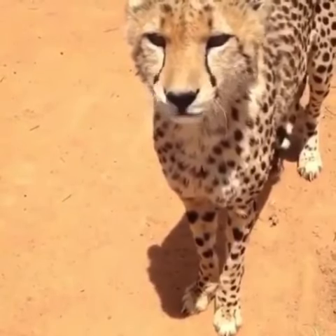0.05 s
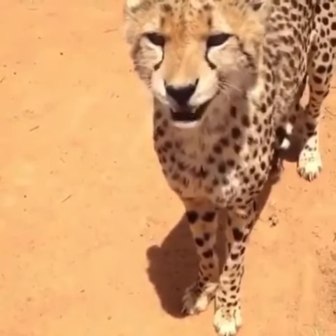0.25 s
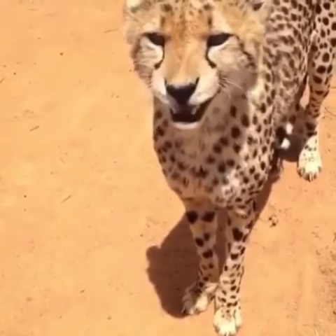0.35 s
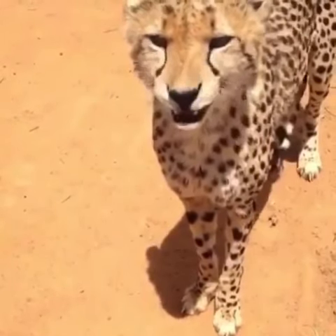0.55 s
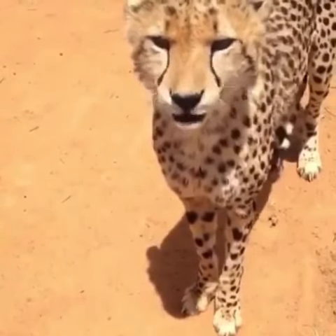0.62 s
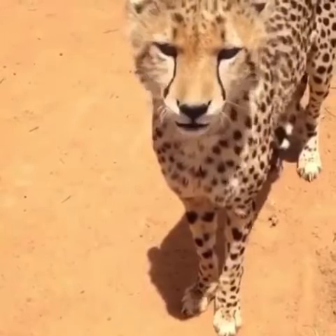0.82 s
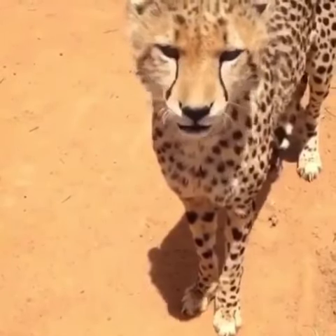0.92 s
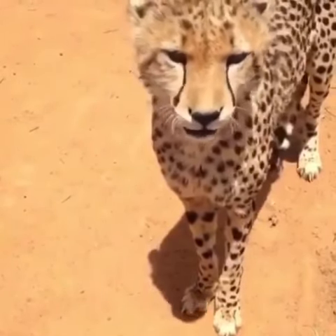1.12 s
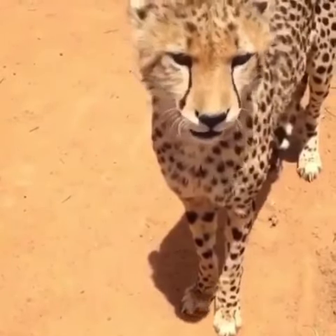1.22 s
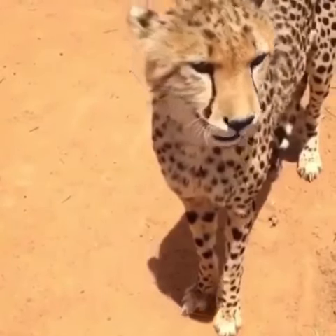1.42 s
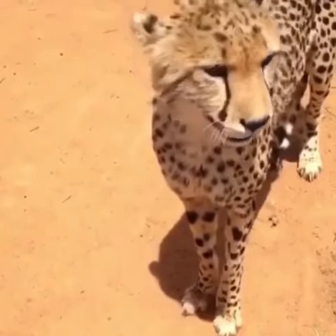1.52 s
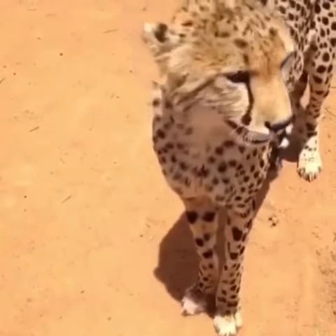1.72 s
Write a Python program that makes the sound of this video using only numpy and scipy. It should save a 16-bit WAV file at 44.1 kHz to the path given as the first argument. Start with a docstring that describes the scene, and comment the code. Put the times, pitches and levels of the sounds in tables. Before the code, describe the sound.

A cheetah close by gives one high, clear mew that rises slightly and sags, ending in a faint puff of breath. A few distant birds chirp, then comes a soft knock, over quiet outdoor air and thin insect buzz.

```python
"""A cheetah close by on open sandy ground; quiet air and a thin insect buzz throughout.
Its mouth parts with a small wet smack. From 0.2 s, one high, nearly pure mew: the pitch arches,
then sags; throat resonances lift the weak overtones. A puff of air follows.
From 0.9 s, a few far birds chirp. At 1.7 s, one soft knock."""
import sys
import numpy as np
from scipy import signal
from scipy.fft import rfft, irfft
from scipy.io import wavfile
from scipy.ndimage import uniform_filter1d

SR = 44100
rng = np.random.default_rng(int(sys.argv[2]) if len(sys.argv) > 2 else 0)


def master_out(mix):
    """Clip the mix to full scale and print it as 16-bit PCM to the path in sys.argv[1]."""
    frames = np.transpose(np.atleast_2d(mix))
    ceiling = np.clip(frames, -1, 1)
    pcm = np.round(ceiling * 32767).astype(np.int16)
    wavfile.write(sys.argv[1], SR, pcm)


N = 77175


def from_db(db):
    """Decibels to gain."""
    return 10 ** (np.asarray(db) / 20)


def seconds():
    """Time of every sample."""
    return np.arange(N) / SR


def unit_rms(x):
    """Scale to rms 1."""
    return x / np.sqrt(np.mean(x ** 2) + 1e-20)


def curve(rows):
    """Join (time_s, value) rows by lines with rounded corners."""
    return uniform_filter1d(np.interp(seconds(), *np.transpose(rows)), size=200)


def swell(peak_s, rise_s, fall_s):
    """Bell envelope; rise_s and fall_s reach to 1/e."""
    t = seconds() - peak_s
    return np.exp(-np.minimum((t / np.where(t < 0, rise_s, fall_s)) ** 2, 60))


def phase_of(hz):
    """Running phase of a frequency curve, in radians."""
    return 2 * np.pi * np.cumsum(hz) / SR


def drift(rate_hz):
    """Random wander at unit rms, rolled off above rate_hz."""
    hz = np.arange(N // 2 + 1) * SR / N
    return unit_rms(irfft(rfft(rng.standard_normal(N)) / (1 + (hz / rate_hz) ** 2), N))


def noise(colour):
    """Unit-rms noise shaped by (freq_hz, relative_db) rows."""
    hz, db = np.transpose(colour)
    bins_hz = np.arange(N // 2 + 1) * SR / N + 1
    gain = from_db(np.interp(np.log(bins_hz), np.log(hz), db)) * np.minimum(bins_hz / hz[0], 1)
    return unit_rms(irfft(rfft(rng.standard_normal(N)) * gain, N))


def struck(hits, modes):
    """Clicks ring damped modes of alternating sign."""
    clicks, out = np.full(N, 1e-18), 0
    for start_s, db in hits:
        clicks[int(start_s * SR)] += from_db(db)
    for k, (hz, db, t60_s) in enumerate(modes):
        radius, angle = from_db(-60 / (t60_s * SR)), 2 * np.pi * hz / SR
        ring = signal.lfilter([0, np.sin(angle)], [1, -2 * radius * np.cos(angle), radius ** 2], clicks)
        out = out + (-1) ** k * from_db(db) * ring
    return out


def outdoor_air():
    """Quiet steady noise, strongest in the bass."""
    # air spectrum: freq_hz, relative_db
    colour = [(15, -41.5), (25, -9), (130, -3), (342, -9), (367, -10.5), (413, -10), (1250, -18),
              (1660, -19), (1830, -17), (2930, -19), (4580, -22.5), (7000, -17), (9100, -24.5),
              (15400, -120)]
    return from_db(-66.5) * noise(colour)


def insects():
    """Each quick stroke swells and sweeps high resonances that wander together in pitch."""
    # buzz centre: time_s, pitch_hz
    centre = [(0, 8090), (.13, 8220), (.28, 8323), (.47, 8185), (.58, 8180), (.83, 8150), (.95, 8346),
              (1.1, 8200), (1.24, 8210), (1.31, 8420), (1.45, 8320), (1.68, 8140), (1.75, 8110)]
    # resonances: offset_hz, width_hz, relative_db
    modes = [(-10, 250, -3.5), (-690, 130, -7.5), (571.5, 50, -18.5)]
    stroke_hz, stroke_depth, sweep_hz, grit = 58, 0.19, 95, 0.7
    stroke = phase_of(stroke_hz * (1 + 0.033 * drift(14)))
    pitch_hz = curve(centre) + sweep_hz * np.sin(stroke)
    skirt = signal.butter(3, 260.6, fs=SR, output="sos")
    buzz = 0
    for offset_hz, width_hz, db in modes:
        ringing = 1 + grit * signal.sosfilt(skirt, drift(width_hz) + 1j * drift(width_hz))
        buzz = buzz + from_db(db) * (ringing * np.exp(1j * phase_of(pitch_hz + offset_hz))).real
    return from_db(-61) * unit_rms(buzz * (1 + stroke_depth * np.cos(stroke)))


def birds():
    """One falling chirp and some far whistles, scattered by the surroundings."""
    # whistles: peak_s, half_length_s, pitch_hz, glide_hz_per_s, waver_ratio, level_db
    notes = [(0.875, 0.021, 1997, 1001, 0.021, -79), (.965, .05, 1680, 296.5, 0.0043, -78.5),
             (1.218, 0.015, 2610, 15004, 0.082, -69), (1.262, 0.032, 2890, -2000, 0.076, -73.5),
             (1.521, .006, 4210, -12000, 0.07, -66), (1.541, 0.012, 2700, -7000, 0.039, -68.5)]
    chirp_s, top_hz, end_hz, glide_s = 1.378, 5820, 3550, 0.017
    echo_db, echo_t60_s = -2, 0.15
    t = seconds()
    chirp_hz = end_hz + (top_hz - end_hz) * np.exp(-np.maximum(t - chirp_s, 0) / glide_s)
    song = from_db(-55) * swell(peak_s=1.402, rise_s=0.017, fall_s=0.03) * np.sin(phase_of(chirp_hz))
    for peak_s, half_s, hz, glide_hz_per_s, waver, db in notes:
        note_hz = (hz + glide_hz_per_s * (t - peak_s)) * (1 + waver * drift(199.4))
        song += from_db(db) * swell(peak_s, half_s, half_s) * np.sin(phase_of(note_hz))
    scatter = unit_rms(rng.standard_normal(N) * from_db(-60 * t / echo_t60_s)) / np.sqrt(N)
    echo = from_db(echo_db) * signal.fftconvolve(song, scatter)[:N]
    return np.sqrt(2) * (song + echo)


def knock():
    """One soft knock: faint contact tick, round thud, dull scuff."""
    # knock and faint rebound: start_s, level_db
    hits = [(1.7036, -30.5), (1.7098, -53)]
    # thud modes: freq_hz, gain_db, t60_s
    thud_modes = [(495, -0.5, 0.0097), (844, 2.5, 0.0052)]
    # contact modes: freq_hz, gain_db, t60_s
    tick_modes = [(2420, -21, 0.015), (3800, -19, 0.0064)]
    # scuff spectrum: freq_hz, relative_db
    scuff_colour = [(200, -8), (500, 4.5), (1000, -6.5), (1500, -17), (3200, -12), (5000, -25)]
    lowpass = signal.butter(4, 1120, fs=SR, output="sos")
    thud = signal.sosfilt(lowpass, struck(hits, thud_modes))
    scuff = from_db(-57) * swell(peak_s=hits[0][0], rise_s=0.018, fall_s=0.033) * noise(scuff_colour)
    return struck(hits, tick_modes) + thud + scuff


def lip_smack():
    """The lips part with a brief hiss; wet ticks ring the mouth."""
    # wet ticks: start_s, level_db
    ticks = [(.0532, -45), (.0575, -72), (.063, -48), (.071, -53), (.0755, -67)]
    # mouth modes: freq_hz, gain_db, t60_s
    modes = [(1253, 0.5, 0.0052), (1760, -4, 0.011), (2300, -15, 0.0042), (2880, -11, 0.0029)]
    # lip noise spectrum: freq_hz, relative_db
    colour = [(200, -13), (800, -12), (1400, -7), (2900, -11.5), (4200, -16.5), (6000, -13.5), (9000, -26)]
    hiss = from_db(-59) * swell(peak_s=0.067, rise_s=0.02, fall_s=0.013) * noise(colour)
    return hiss + struck(ticks, modes)


def breath():
    """Escaping air: a rasp late in the mew, a thin hiss through the closing mouth, then a puff."""
    # rasp spectrum: freq_hz, relative_db
    rasp_colour = [(900, -20.5), (1400, -12), (1700, -10.5), (2100, 4), (2600, -14), (3900, -20),
                   (4700, -4.5), (5200, -8), (6000, -26.5)]
    # hiss spectrum: freq_hz, relative_db
    hiss_colour = [(3000, -21), (4000, -9.5), (4550, 5), (5100, -5), (5800, -27.5)]
    # puff spectrum: freq_hz, relative_db
    puff_colour = [(100, -3.5), (250, 5), (1000, 1), (1600, -4.5), (2500, -5.5), (3600, -12), (4500, -8),
                   (5600, -40), (9000, -44)]
    # overlapping puffs: peak_s, rise_s, fall_s, level_db
    puffs = [(0.671, 0.025, 0.034, -58), (0.723, 0.0089, 0.053, -55.5)]
    rasp = from_db(-64) * swell(peak_s=0.5, rise_s=0.068, fall_s=0.055) * noise(rasp_colour)
    hiss = from_db(-69.5) * swell(peak_s=0.635, rise_s=0.035, fall_s=0.1) * noise(hiss_colour)
    puff_gain = sum(from_db(db) * swell(peak_s, rise_s, fall_s) for peak_s, rise_s, fall_s, db in puffs)
    return rasp + hiss + puff_gain * noise(puff_colour)


def mew():
    """Strong clean fundamental; weak overtones rise as they cross the throat's resonances."""
    # pitch arch: time_s, pitch_hz
    arch = [(0.204, 857), (0.25, 908), (0.272, 907.4), (0.301, 923), (0.383, 955.5), (0.445, 937.8),
            (0.47, 927.7), (0.514, 906), (0.555, 903.7), (0.646, 801.8), (0.657, 763), (0.659, 777),
            (0.662, 643), (0.664, 671)]
    # vocal effort: time_s, level_db
    effort = [(0.208, -36.5), (0.294, -29), (0.322, -29), (0.336, -26.5), (0.379, -24.5), (0.411, -24.5),
              (0.447, -26.5), (0.465, -26), (0.491, -29), (0.555, -28.5), (0.586, -32), (0.617, -34),
              (0.65, -33.5), (0.659, -31.5), (0.663, -40)]
    # shifting throat resonances: first_hz, last_hz, width_hz, first_db, last_db
    throat = [(1330, 1330, 70, -59.5, -16), (1697, 1711, 82, -24.5, -11.5), (2200, 2200, 140, -56.5, -21),
              (2735, 2567, 143, -20.5, -31), (2860, 2850, 94, -32.5, -39.5), (3600, 3394, 190, -56, -18),
              (4400, 5300, 100, -48.5, -47), (5380, 5250, 130, -51.5, -26)]
    # brief splits into undertones: peak_s, half_length_s, pitch_ratio, relative_db
    cracks = [(0.485, 0.012, .333, -26.5), (0.537, 0.0099, 0.59, -34.5), (.667, .009, 0.39, -37)]
    start_s, end_s, attack_s, release_s = 0.199, 0.6774, 0.0083, 0.012
    jitter, shimmer_db, flutter_db = 0.003, 0.45, 1.5
    t = seconds()
    pitch_hz = curve(arch) * (1 + jitter * drift(120))
    phase = phase_of(pitch_hz)
    progress = np.clip((t - start_s) / (end_s - start_s), 0, 1)
    gate = np.clip(np.minimum((t - start_s) / attack_s, (end_s - t) / release_s), 0, 1)
    voice = np.sin(phase)
    for k in range(2, 7):
        gain = 0
        for first_hz, last_hz, width_hz, first_db, last_db in throat:
            detune = (k * pitch_hz - first_hz - (last_hz - first_hz) * progress) / width_hz
            gain = gain + from_db(first_db + (last_db - first_db) * progress) / (1 + 2 * detune ** 2)
        flutter = from_db(flutter_db * drift(35))
        voice += gate ** (k - 2) * gain * flutter * np.sin(k * phase)
    for peak_s, half_s, pitch_ratio, db in cracks:
        under = pitch_ratio * phase + 0.5 * drift(60)
        sidebands = np.sin(phase + under) + 0.1 * np.sin(phase - under)
        sidebands += 0.32 * np.sin(2 * phase + under) + 0.3 * np.sin(2 * phase - under)
        voice += from_db(db) * swell(peak_s, half_s, half_s) * sidebands
    envelope = np.sin(np.pi / 2 * gate) ** 2 * from_db(curve(effort) + shimmer_db * drift(51))
    return np.sqrt(2) * voice * envelope


def scene():
    """Mono mix: cheetah in front; air, insects and birds behind."""
    return (outdoor_air() + mew() + lip_smack() + breath() + knock() + birds() + insects())[None]


def record(dry):
    """Steep low-pass."""
    cutoff_hz = 9100
    return signal.sosfilt(signal.ellip(10, 0.1, 80, cutoff_hz, fs=SR, output="sos"), dry)


dry = scene()
out = record(dry)
master_out(out)
```